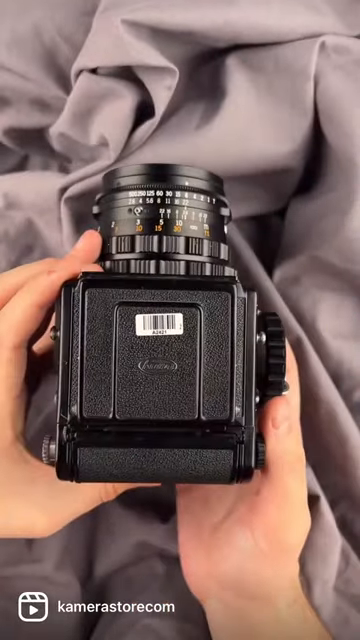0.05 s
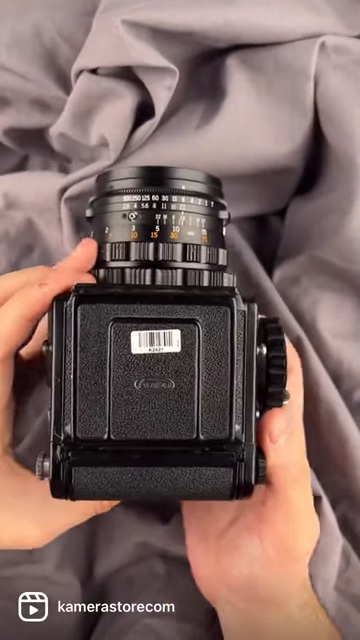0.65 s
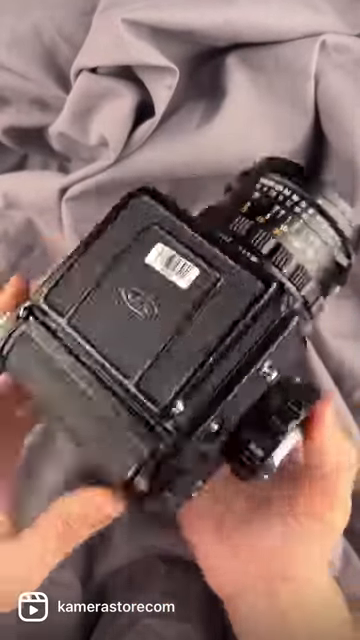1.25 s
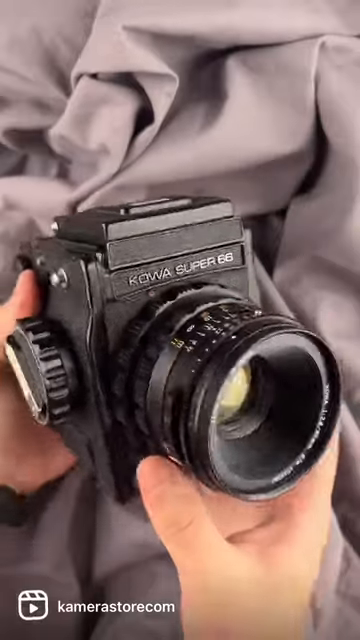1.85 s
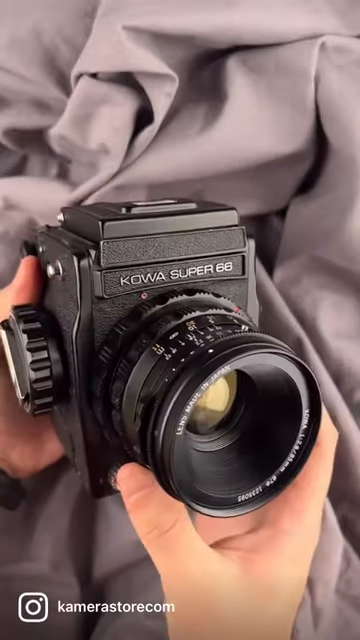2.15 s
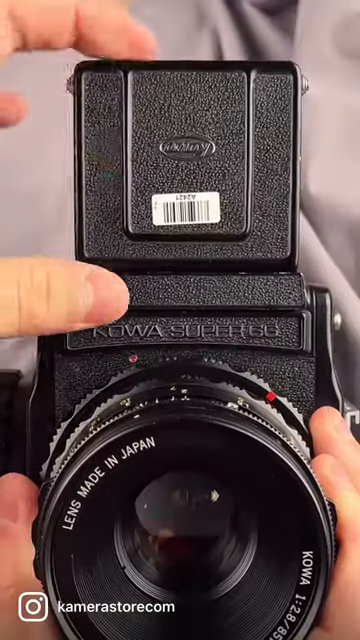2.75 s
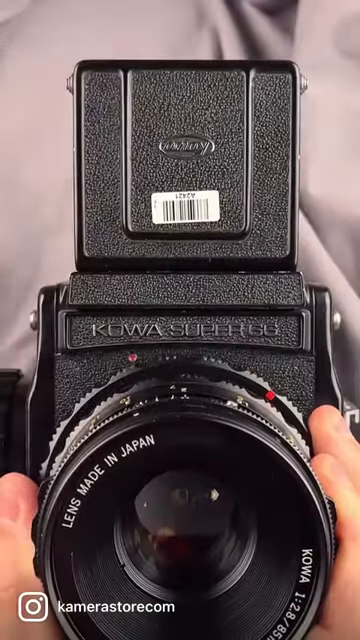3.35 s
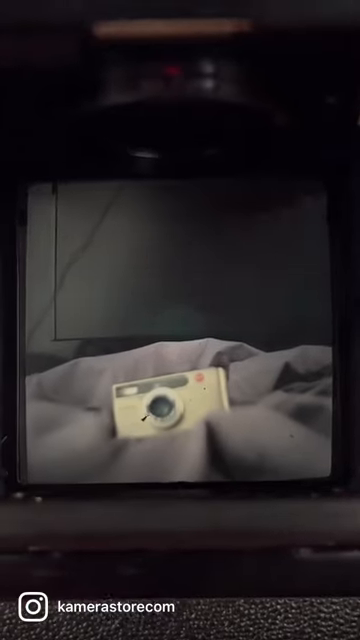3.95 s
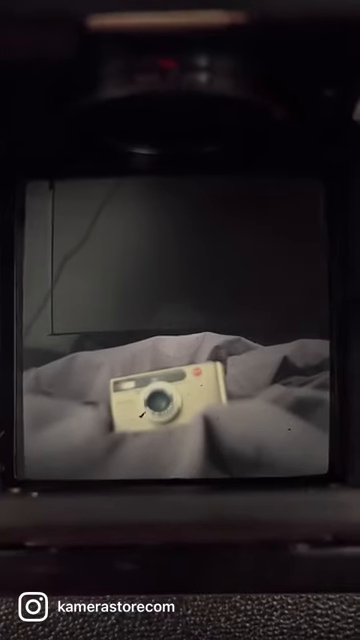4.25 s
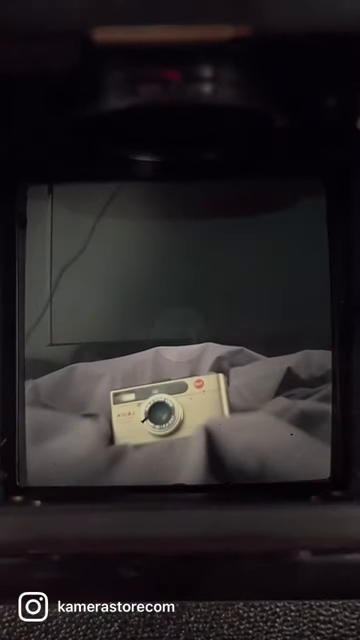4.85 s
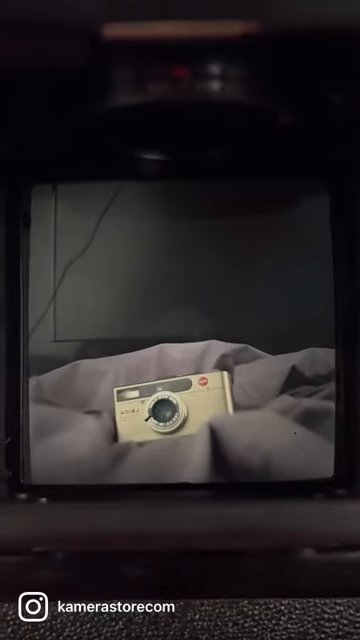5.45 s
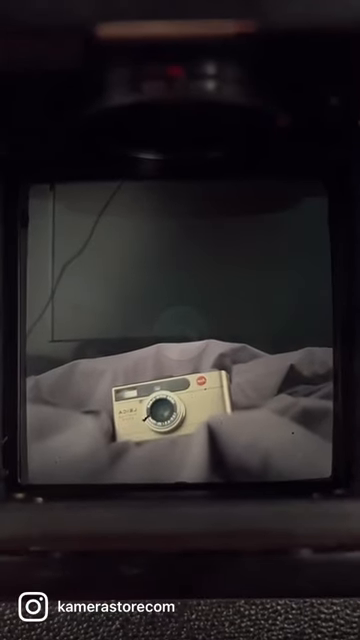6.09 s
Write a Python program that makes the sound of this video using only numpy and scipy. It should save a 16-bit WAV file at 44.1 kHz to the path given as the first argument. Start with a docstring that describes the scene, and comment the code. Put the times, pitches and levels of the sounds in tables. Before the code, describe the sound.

Fingers tick and rub faintly on a metal film camera, close to the microphone. A small fitting gives a brief, bright rattle, then the folding viewfinder hood springs open with a loud metallic clatter. A knob turns softly with dull knocks, a catch clicks twice, and a firm clack follows near the end. Soft low thumps and a faint room hum lie underneath.

```python
"""Fingers tick and rub on a heavy metal film camera, handled close up over a cloth-covered table.
A small fitting rattles, the folding viewfinder hood springs open with a clatter, then the focusing
knob turns and the mechanism clicks and clacks. Contacts are short noise bursts, the harder ones ring
metal modes; friction is grainy noise. Soft low thumps sound underneath. The room hums faintly."""
import sys
import numpy as np
from scipy import signal
from scipy.fft import rfft, irfft, next_fast_len
from scipy.io import wavfile
from scipy.ndimage import uniform_filter1d, map_coordinates

SR = 44100
rng = np.random.default_rng(int(sys.argv[2]) if len(sys.argv) > 2 else 0)


def int16_out(signal):
    """Quantize to a 16-bit WAV file."""
    q = np.round(np.clip(np.atleast_2d(signal).T, -1, 1) * 32767)
    wavfile.write(sys.argv[1], SR, q.astype(np.int16))


N = 274302
TIME = np.arange(N) / SR

# latch and plate contacts: (time [s], level [dB], tilt [dB/oct], t60 [s], spot struck [Hz])
LATCH_HITS = [(2.641, -38.5, -0.5, 0.03, 1600), (2.648, -29.5, 3.5, 0.076, 4500),
              (2.6512, -19.5, 4.5, 0.022, 3900)]
PLATE_HITS = [(2.6828, -11.5, 2.1, 0.055, 1000), (2.6862, -12, .5, 0.023, 1000),
              (2.6903, -13.5, 0.37, 0.017, 2500), (2.6925, -11.5, -1.1, 0.037, 1350),
              (2.7068, -12.5, .5, 0.024, 1080), (2.7098, -14, 1, 0.036, 3360),
              (2.7165, -12.5, -0.82, 0.035, 1450), (2.7205, -17.5, -1, 0.027, 1350),
              (2.7415, -33.5, 1.1, 0.072, 4700)]
# latch and plate modes: (frequency [Hz], gain [dB], t60 [s])
LATCH_MODES = [(1680, -3.5, 0.04), (2230, -0.5, .06), (3900, 3.5, .05), (4500, -7, 0.094),
               (7000, -8, 0.044)]
PLATE_MODES = [(1076, -2, 0.012), (1215, 0, .045), (1346, 1, 0.094), (1420, -21, 0.38), (1457, -3.5, .045),
               (1678, -9.5, .05), (1875, -10, .09), (2088, -7.5, 0.095), (2455, -6, 0.078),
               (2697, -10.5, 0.042), (3033, -12.5, 0.088), (3364, -6.5, 0.082), (3920, -14, .1),
               (4230, -18, 0.16), (4600, -17, .1), (5220, -7, .08), (6300, -19.5, .13)]
# hood spectrum: (frequency [Hz], gain [dB])
HOOD_TONE = [(330, -33), (550, -35), (800, -14), (1050, -4), (1350, -0.5), (2000, -4.5), (3000, -7.5),
             (5200, -10), (7000, -17), (9500, -20.5), (12000, -17.5)]
def hood():
    """The latch lets go with a ping, the hinges scrape, the sprung plates slap open one by one."""
    latch = contacts(LATCH_HITS, HOOD_TONE, spot_db=7.5) + amp(-6) * ringing(LATCH_HITS, LATCH_MODES)
    swing = run_up(start_s=2.655, stop_s=2.724, db=-28, rise_db=3.5, onset_db_s=950, release_db_s=480)
    hinge_tone = [(400, -27), (1000, -10), (1500, 4), (2000, -4.5), (5000, -2.5),
                  (7000, -13), (13000, -14)]
    scrape = swing * noise(hinge_tone, grain_db=2)
    plates = contacts(PLATE_HITS, HOOD_TONE, spot_db=6.5) + amp(-14) * ringing(PLATE_HITS, PLATE_MODES)
    return latch + scrape + plates


# fitting contacts: (time [s], level [dB], tilt [dB/oct], t60 [s])
FITTING_HITS = [(1.3842, -39, -1.5, 0.016), (1.3873, -13.5, 2, 0.02), (1.3895, -27, -6, 0.041),
                (1.3967, -19.5, 2.5, 0.028), (1.3995, -28.5, 6, 0.02), (1.4122, -19.5, 2, 0.035),
                (1.4165, -34.5, -2, 0.06), (1.4245, -31, 4, .02)]
# fitting spectrum: (frequency [Hz], gain [dB])
FITTING_TONE = [(200, -36), (550, -29), (800, -24), (1000, -10), (1500, -9.5), (2100, 3.5), (2700, -1),
                (4200, -5.5), (8000, -4), (11500, -2), (13000, -1.5)]
# fitting modes: (frequency [Hz], gain [dB], t60 [s])
FITTING_MODES = [(940, -22, .04), (1430, -16.5, 0.018), (1430, -24.5, 0.3), (1950, -1, 0.036),
                 (2380, 1.5, 0.061), (2750, -1, 0.035), (3250, -3.5, 0.027), (9500, -8, 0.025),
                 (11600, 6.5, 0.021)]
def fitting():
    """A small metal part rattles brightly; its hardest contact rings it."""
    rattle = contacts(FITTING_HITS, FITTING_TONE, damping=1.05)
    return rattle + amp(-15) * ringing(hardest(FITTING_HITS), FITTING_MODES)


# catch and stop contacts: (time [s], relative level [dB], tilt [dB/oct], t60 [s])
CATCH_HITS = [(4.161, -25.5, 2.1, 0.015), (4.1843, -29, -1.2, 0.017)]
STOP_HITS = [(5.321, -38, 4, .015), (5.3228, -16.5, 1.5, 0.015), (5.3252, -16.5, -4, 0.015),
             (5.333, -31.5, -1.5, 0.068)]
# catch and stop spectra: (frequency [Hz], gain [dB])
CATCH_TONE = [(400, -48), (1000, -30), (1350, -13), (1720, 2), (2100, -8), (2800, -4.5), (3100, -17.5),
              (4200, -16.5), (6000, -28.5), (9000, -40.5), (13000, -42)]
STOP_TONE = [(300, -43), (530, -28), (680, -8.5), (880, -14), (1020, -1), (1450, 5), (1950, -2.5),
             (2400, 5), (2850, 2), (3200, -5), (6000, -11), (7500, -23), (13000, -26)]
# camera body modes: (frequency [Hz], gain [dB], t60 [s])
BODY_MODES = [(996, -21, 0.41), (1041, -1.5, 0.12), (1355, -19, 0.34), (1440, -19.5, 0.39),
              (1780, -9, 0.062), (2170, 3, 0.07), (2510, -16.5, 0.16), (2820, -30, 0.85),
              (2917, 1.5, 0.077), (2995, -31.5, 0.52), (4090, -4.5, 0.078), (5292, -27, 0.1206)]
def mechanism():
    """A catch clicks twice, then a firm stop rings the body."""
    catch = amp(1) * contacts(CATCH_HITS, CATCH_TONE)
    stop = contacts(STOP_HITS, STOP_TONE, damping=0.94)
    body = amp(-15.5) * ringing(hardest(STOP_HITS), BODY_MODES)
    return with_echo(catch + stop + body, delay_s=0.0083, echo_db=-18.5)


# finger and knob ticks: (time [s], level [dB], tilt [dB/oct], t60 [s], spot touched [Hz])
TICKS = [(0.512, -57.5, -3, .023, 3200), (0.645, -49.5, -1.5, .046, 1390), (0.865, -48.5, -1.5, .035, 3080),
         (0.938, -49.5, -2, .038, 2020), (1.0765, -54, -4.5, .09, 3160), (1.098, -43.5, -5, .028, 1880),
         (1.2502, -39, -0.5, .011, 5750), (1.336, -51.5, 4.5, .059, 11400), (1.3463, -44.5, -3, .012, 2740),
         (1.622, -53.5, 9, .02, 11400), (1.6612, -43.5, 5.5, .024, 2260), (1.957, -50, 12, .022, 6300),
         (2.5395, -53, 3, .028, 2080), (3.412, -64, 0, .038, 4500), (3.711, -51.5, -6, .024, 2800),
         (5.218, -51, -4.5, .02, 1800)]
# tick spectrum: (frequency [Hz], gain [dB])
TICK_TONE = [(300, -17.5), (800, -11.5), (1400, -3), (3000, -1), (5000, -5), (8000, -13), (13000, -15.5)]
def ticks():
    """Light touches, each coloured by the spot it lands on."""
    return contacts(TICKS, TICK_TONE, spot_db=11)


# knocks while turning: (time [s], level [dB], tilt [dB/oct])
KNOCKS = [(3.753, -49, 3), (3.801, -52, -1.5), (3.8205, -45.5, -1.5), (3.875, -54.5, 3.5), (3.9178, -45, 1),
          (3.9438, -45, -8), (3.965, -46, -10), (3.98, -53, 2.5), (4.021, -52, 3.5)]
# knock and friction spectra: (frequency [Hz], gain [dB])
KNOCK_TONE = [(150, 2.5), (330, 7), (600, 15), (850, -8.5), (1200, 13), (1700, -5.5), (2300, 0),
              (3500, -32), (6000, -10), (12000, -46)]
FRICTION_TONE = [(100, -8), (300, 5.5), (600, -7.5), (1200, -9), (2500, -12), (5000, -20.5), (12000, -33)]
# ringing tick as the knob stops: (time [s], level [dB], tilt [dB/oct], t60 [s], spot [Hz], spot [Hz])
KNOB_STOP = [(4.004, -49, -2, .06, 2900, 4100)]
def knob():
    """The knob turns with friction and dull knocks, then comes to rest and rings the body."""
    knocks = contacts([(s, db, tilt, 0.021) for s, db, tilt in KNOCKS], KNOCK_TONE)  # t60 21 ms
    turn = run_up(start_s=3.71, stop_s=3.975, db=-54, rise_db=17, onset_db_s=110, release_db_s=270)
    friction = turn * noise(FRICTION_TONE, grain_db=3)
    body = amp(-5.5) * ringing(KNOB_STOP, BODY_MODES)
    return friction + knocks + body + contacts(KNOB_STOP, TICK_TONE, spot_db=9)


# low thumps: (time [s], level [dB], frequency [Hz], t60 [s])
THUMPS = [(1.019, -42.5, 91.2, 0.75), (2.714, -32.5, 62.4, 0.37), (3.97, -38, 48, 0.35),
          (5.325, -38.5, 42.5, 0.47), (5.629, -44.5, 76.1, .4)]
def thumps():
    """Soft low thumps, each a decaying sine with a rounded attack."""
    track, t = np.zeros(N), np.arange(SR // 2) / SR
    attack = 1 - np.exp(-t / 0.0042)
    for s, db, hz, t60 in THUMPS:
        add(track, s, amp(db - 60 * t / t60) * attack * np.sin(2 * np.pi * hz * t))
    return track


# fingertip squeaks: (time [s], length [s], level [dB], pitch [Hz])
SQUEAKS = [(1.192, .017, -46.5, 1385), (1.211, 0.018, -45, 1335)]
def squeaks():
    """Skin sticks and slips unevenly on the casing: a rough tone whose overtones smear."""
    track = np.zeros(N)
    for s, length, db, hz in SQUEAKS:
        phase = 2 * np.pi * hz * TIME + 0.45 * wobble(700)
        swell = np.sqrt(abs(np.sin(np.pi * np.clip((TIME - s) / length, 0, 1))))
        overtones = amp(-15.5) * sum(np.sin(k * phase) for k in range(2, 5))
        track += amp(db) * swell * (np.sin(phase) + overtones)
    return track


# hand strokes: (centre [s], length [s], relative level [dB])
STROKES = [(0.65, .24, -65.5), (0.87, .18, -67.5), (1.085, .1, -62), (1.215, .09, -59.5),
           (1.48, .42, -64.8), (1.86, .3, -65.3), (2.42, .16, -68), (2.625, .065, -58), (3.33, .17, -65.5),
           (4.72, .26, -70.5)]
# rubbing spectrum: (frequency [Hz], gain [dB])
RUB_TONE = [(500, -15), (1500, 6), (3500, -0.5), (7000, -4), (10000, -8), (12500, -4)]
def rubbing():
    """Skin and cloth slide over the casing; each stroke swells and fades over a faint resting grip."""
    edge_drop_db, grip = 6, amp(-82)
    swells = [amp(db - edge_drop_db * abs(2 * (TIME - s) / length) ** 1.5) for s, length, db in STROKES]
    envelope = np.sqrt(grip ** 2 + np.sum(np.square(swells), axis=0))
    return amp(-2) * envelope * noise(RUB_TONE, grain_db=2)


# room spectra, before and after 3.4 s: (frequency [Hz], gain [dB])
AIR_EARLY = [(20, -21.5), (45, -1), (100, -3), (160, -10), (210, -8.5), (245, -14), (275, -10),
             (330, -18.5), (520, -22), (620, -18), (850, -27), (1500, -32), (4000, -41.5), (13000, -52)]
AIR_LATE = [(20, -21.5), (40, 0.5), (90, -3), (160, -8.5), (280, -9.5), (450, -22), (730, -25),
            (850, -20.5), (1300, -31), (1550, -31.5), (4000, -41.5), (13000, -51)]
# hum lines: (frequency [Hz], early level [dB], late level [dB])
HUM = [(69.5, -61, -60), (131, -63.5, -61), (845, -85, -77)]
def room_noise():
    """Background rumble and wavering hum; both change colour abruptly at 3.4 s."""
    late = np.clip((TIME - 3.38) / 0.04, 0, 1)
    track = (1 - late) * amp(-54) * noise(AIR_EARLY) + late * amp(-52.5) * noise(AIR_LATE)
    for hz, early_db, late_db in HUM:
        rms = amp(early_db + late * (late_db - early_db) + 3 * wobble(3.5))
        track += rms * np.sqrt(2) * np.sin(2 * np.pi * hz * TIME + 0.61 * wobble(2))
    return track


# room decay: (frequency [Hz], t60 [s])
ROOM_DECAY = [(300, 0.38), (1500, 0.25), (4000, .22), (8000, .17), (12000, .16)]
def in_room(x, wet_db):
    """x with a short room tail whose treble dies first."""
    hz, t, spectra = signal.stft(rng.standard_normal(SR // 2), SR, nperseg=256)
    tail = signal.istft(spectra * amp(-60 * t / along(ROOM_DECAY, hz)[:, None]), SR, nperseg=256)[1]
    tail = np.pad(tail, (SR // 200, 0)) / np.linalg.norm(tail)
    return x + amp(wet_db) * signal.fftconvolve(x, tail)[:N]


def with_echo(x, delay_s, echo_db):
    """x with one early reflection off a nearby surface."""
    return x + amp(echo_db) * np.interp(TIME - delay_s, TIME, x)


def contacts(hits, tone, spot_db=0, damping=1.1, size=8192):
    """Each contact is a dying burst of dense vibration, coloured by its part and the spot struck."""
    track, t, hz = np.zeros(N), np.arange(size) / SR, np.fft.rfftfreq(size, 1 / SR)
    treble = np.clip((hz - 3000) / 5000, 0, 1)  # decays `damping` times as fast
    octaves = np.log2(np.maximum(hz, 700) / 2000)
    for s, db, tilt, t60, *spots in hits:
        fade = amp(-60 * t / t60)
        shake = rng.standard_normal(size)
        burst = (1 - treble) * rfft(shake * fade) + treble * rfft(shake * fade ** damping)
        power = uniform_filter1d(abs(burst) ** 2, size=60)  # a hard blow spreads its energy evenly
        resonance_db = sum(spot_db / (1 + ((hz - spot) / 260) ** 2) for spot in spots)
        gain = amp(along(tone, hz) + resonance_db + tilt * octaves) / np.sqrt(power)
        cepstrum = irfft(np.log(gain))[:size // 2]  # causal: nothing sounds before the blow
        click = irfft(burst * np.exp(2 * rfft(cepstrum, size)))
        add(track, s, amp(db) * click * np.linalg.norm(fade) / np.linalg.norm(click))
    return track


def ringing(hits, modes):
    """Each contact rings the modes at slightly new strengths; thin metal radiates no bass."""
    track, t = np.zeros(N), np.arange(SR * 2 // 3) / SR
    partials = np.array([amp(db - 60 * t / t60) * np.sin(2 * np.pi * hz * t) for hz, db, t60 in modes])
    for s, db, *_ in hits:
        add(track, s, amp(db + rng.standard_normal(len(modes))) @ partials)
    return signal.sosfilt(signal.butter(4, 800, "highpass", fs=SR, output="sos"), track)


def hardest(hits):
    """The strongest contact, as a one-row table."""
    return [max(hits, key=lambda hit: hit[1])]


def run_up(start_s, stop_s, db, rise_db, onset_db_s, release_db_s):
    """Friction gain: sets in, grows with speed to db, dies once the part stops. Slopes in dB/s."""
    speed = np.clip((TIME - start_s) / (stop_s - start_s), 0, 1)
    onset_db = onset_db_s * np.maximum(start_s - TIME, 0)
    release_db = release_db_s * np.maximum(TIME - stop_s, 0)
    return amp(db - rise_db * (1 - speed) - onset_db - release_db)


def noise(tone, grain_db=0):
    """Coloured noise of rms 1; grain makes it catch and slip."""
    source = rng.standard_normal(N) * amp(grain_db * wobble(370))
    coloured = filtered(source, lambda hz: amp(along(tone, hz)))
    return coloured / np.sqrt(np.mean(coloured ** 2))


def filtered(x, gain):
    """x through the frequency response gain(hz)."""
    size = next_fast_len(N + 8192)
    return irfft(rfft(x, size) * gain(np.fft.rfftfreq(size, 1 / SR)), size)[:N]


def wobble(rate_hz):
    """Smooth random curve, rate_hz knots a second."""
    return map_coordinates(rng.standard_normal(int(N * rate_hz / SR) + 4), [TIME * rate_hz])


def along(points, hz):
    """(Hz, value) points read on a log axis."""
    knots_hz, values = np.transpose(points)
    return np.interp(np.log(hz + 1), np.log(knots_hz), values)


def amp(db):
    """Decibels to gain."""
    return 10 ** (np.asarray(db) / 20)


def add(track, s, sound):
    """Mix a sound in at time s."""
    part = track[round(s * SR):][:len(sound)]
    part += sound[:len(part)]


def scene():
    """Camera, hands and room in mono."""
    camera = in_room(hood(), wet_db=-22.5)
    camera += in_room(fitting(), wet_db=-27.5)
    camera += in_room(mechanism(), wet_db=-28)
    handling = in_room(ticks() + knob() + squeaks() + rubbing(), wet_db=-12.5)
    return (camera + handling + thumps() + room_noise())[None]


def record(dry, top_hz=13050):
    """Steep low-pass at top_hz."""
    return filtered(dry[0], lambda hz: 1 / np.sqrt(1 + (hz / top_hz) ** 160))[None]


dry = scene()
out = record(dry)
int16_out(out)
```